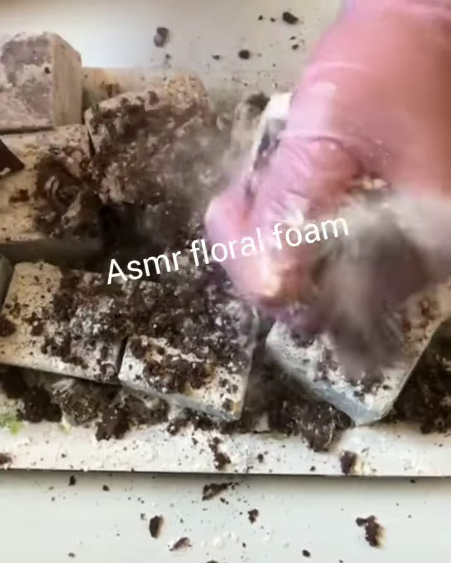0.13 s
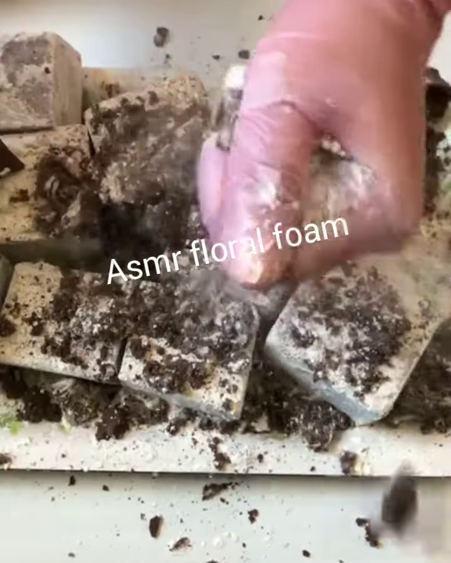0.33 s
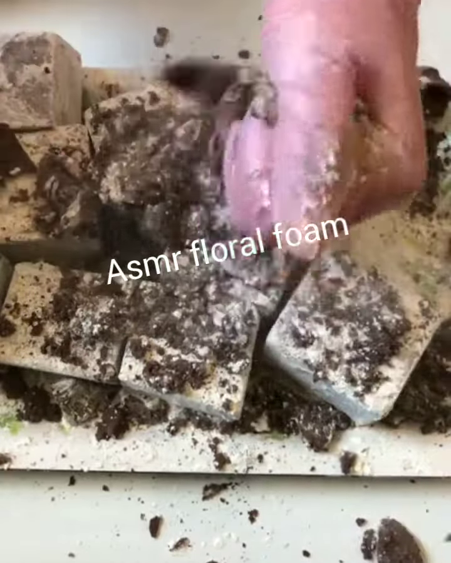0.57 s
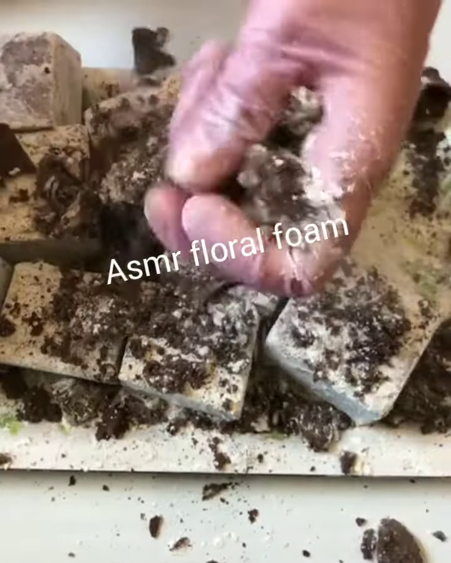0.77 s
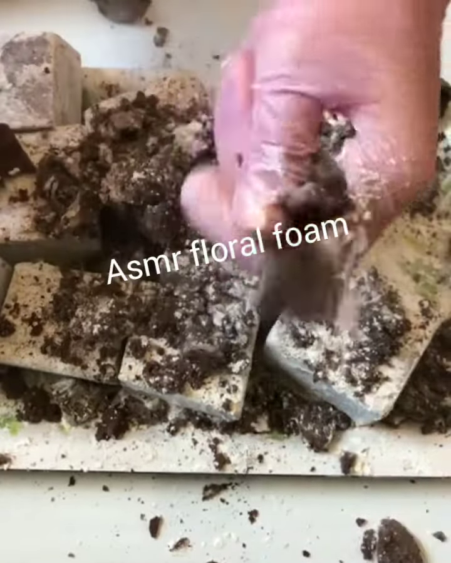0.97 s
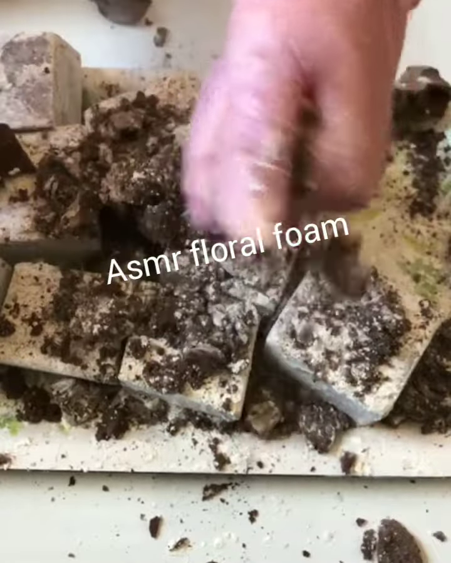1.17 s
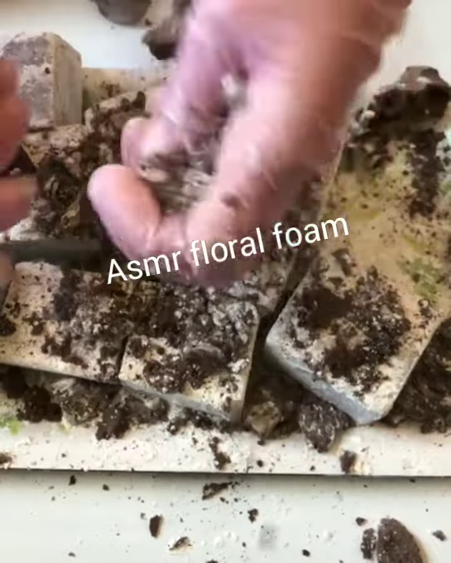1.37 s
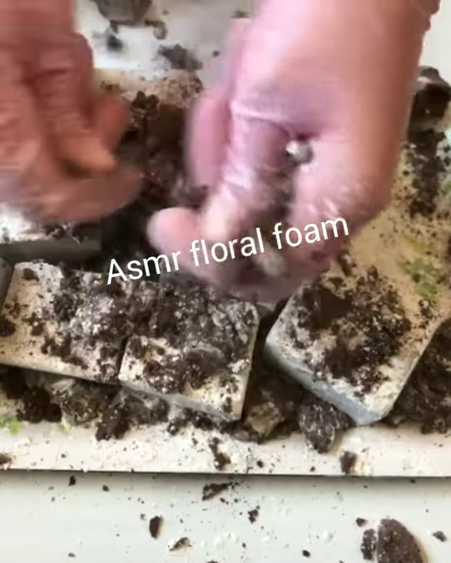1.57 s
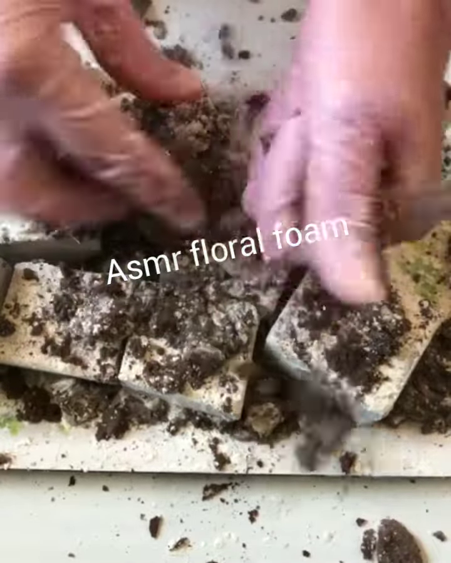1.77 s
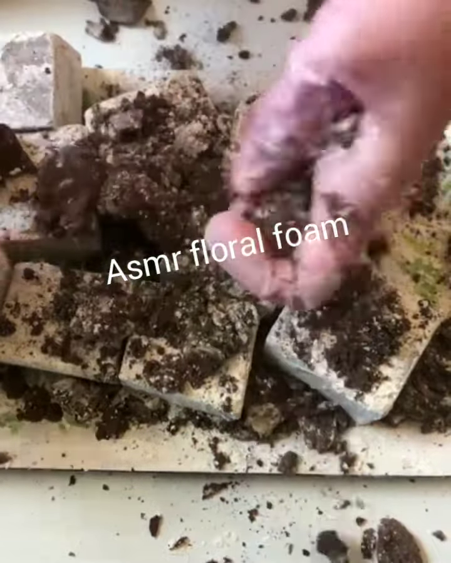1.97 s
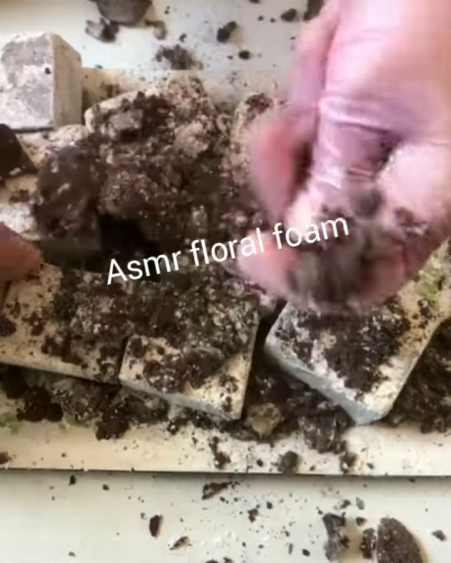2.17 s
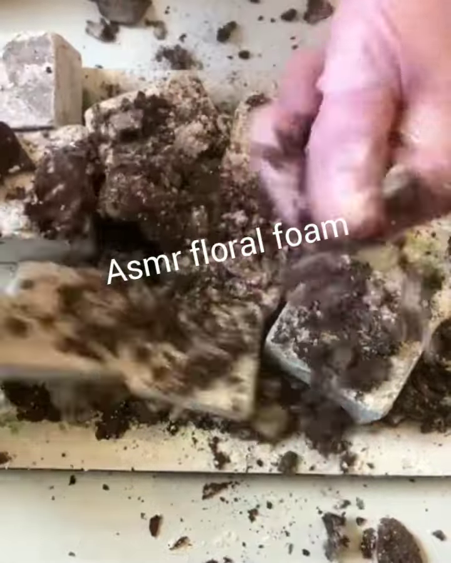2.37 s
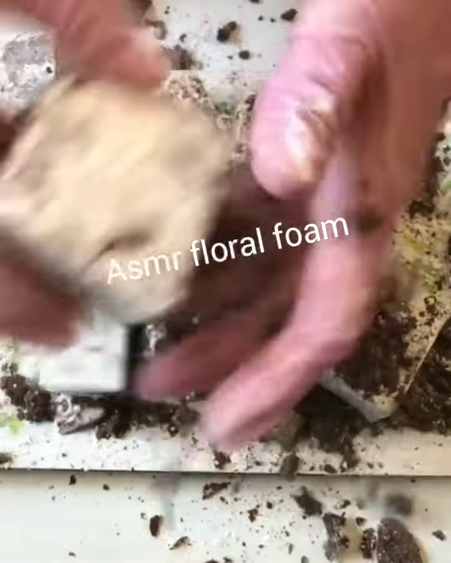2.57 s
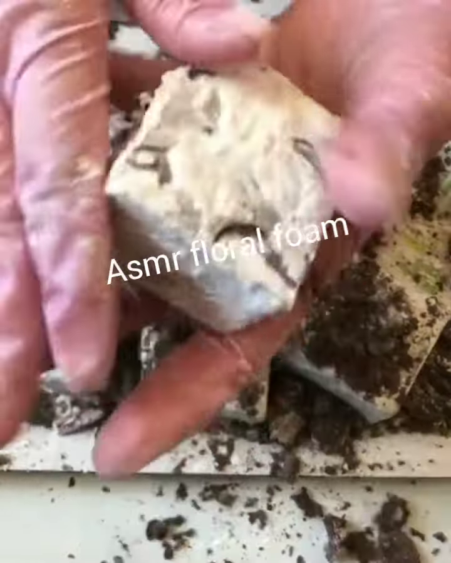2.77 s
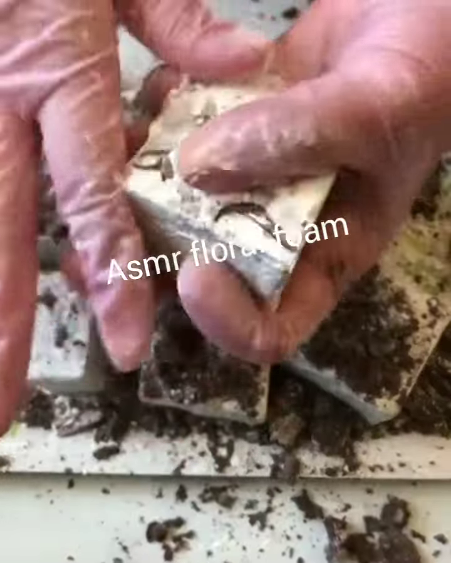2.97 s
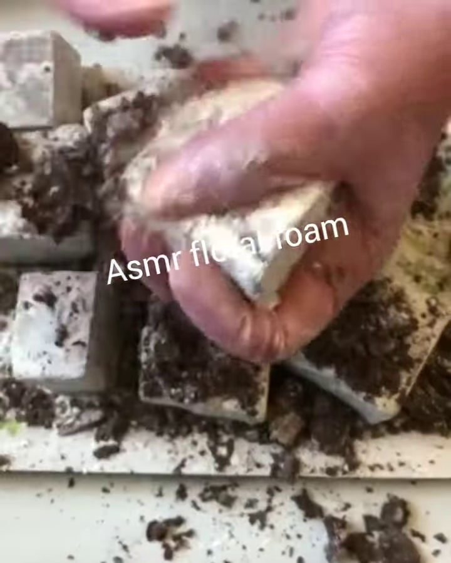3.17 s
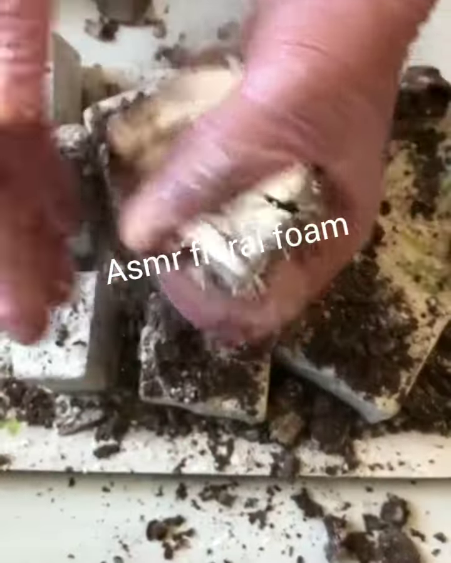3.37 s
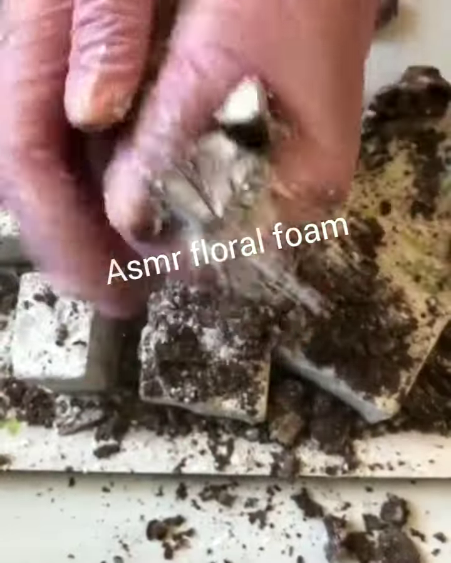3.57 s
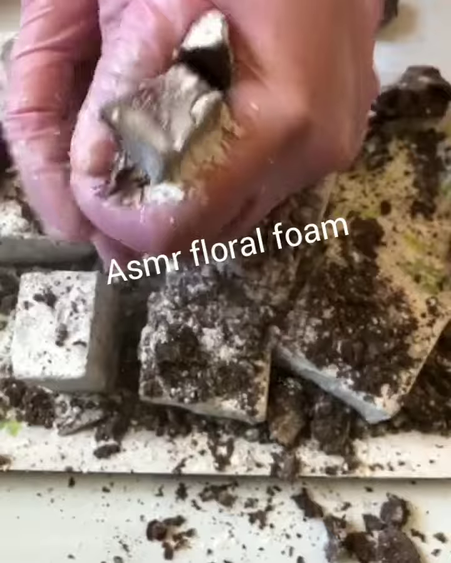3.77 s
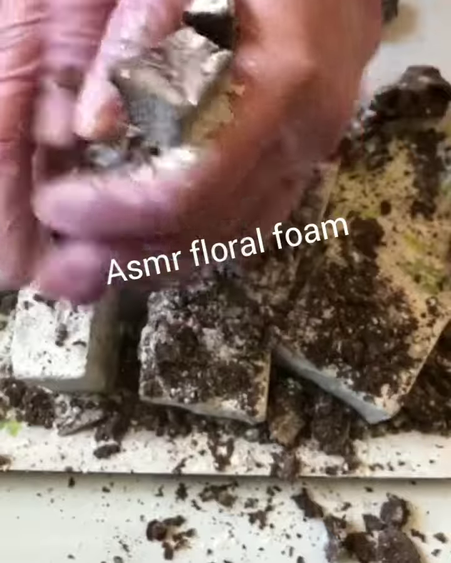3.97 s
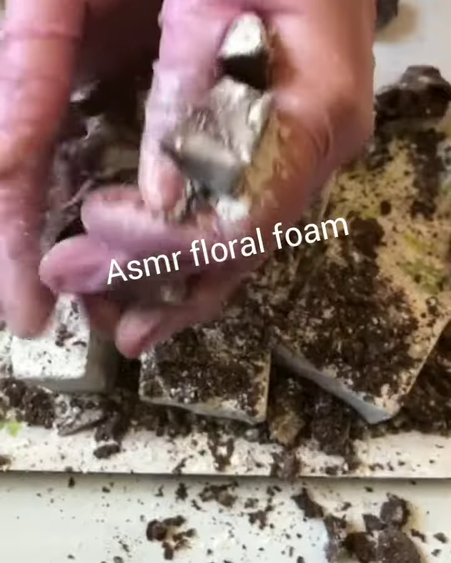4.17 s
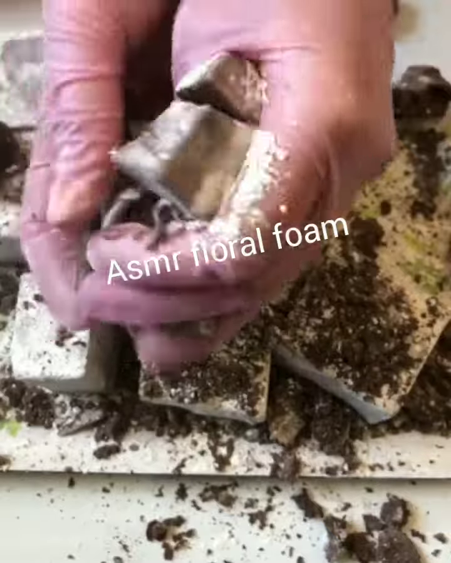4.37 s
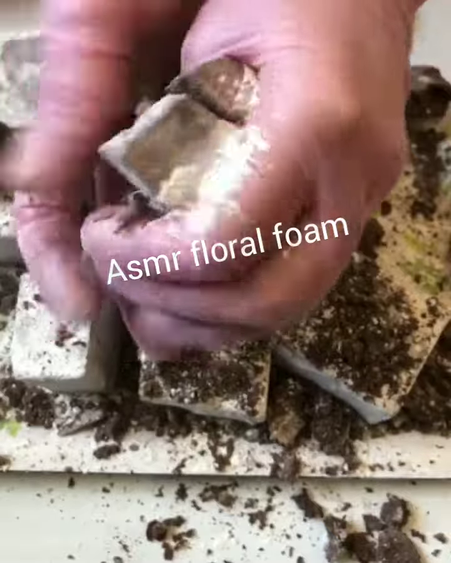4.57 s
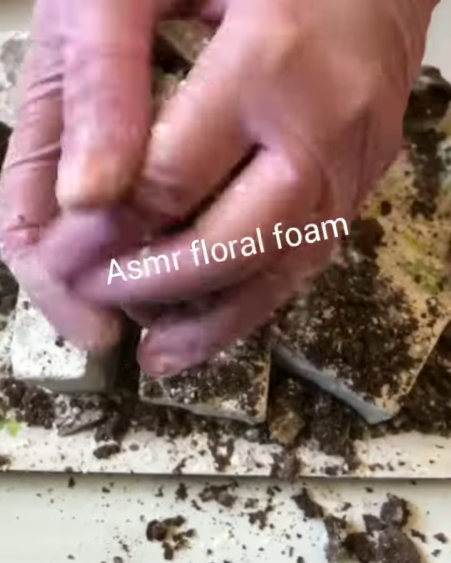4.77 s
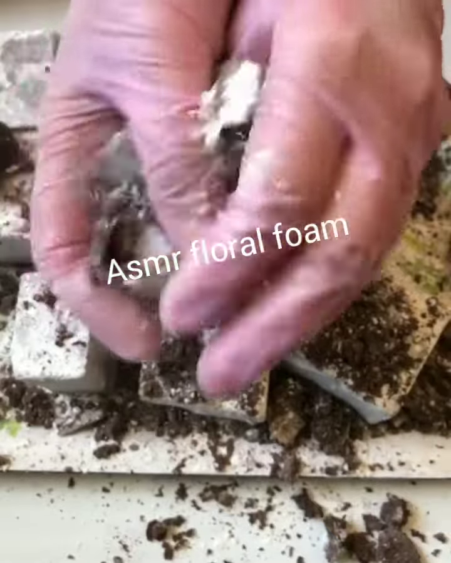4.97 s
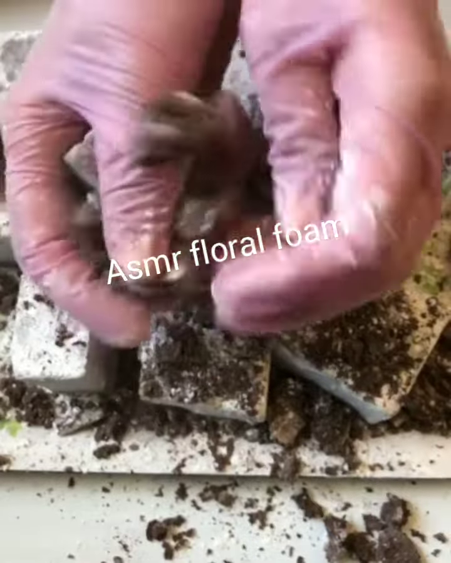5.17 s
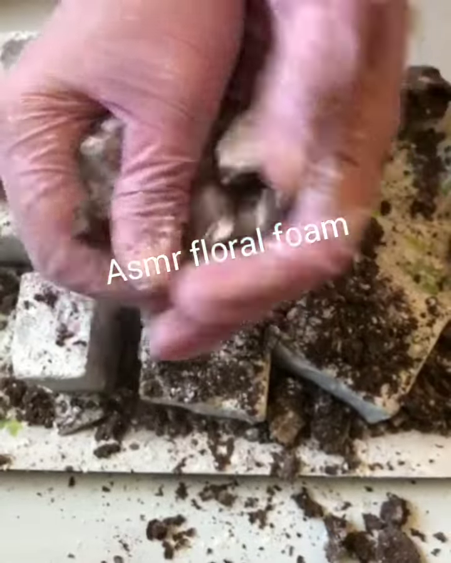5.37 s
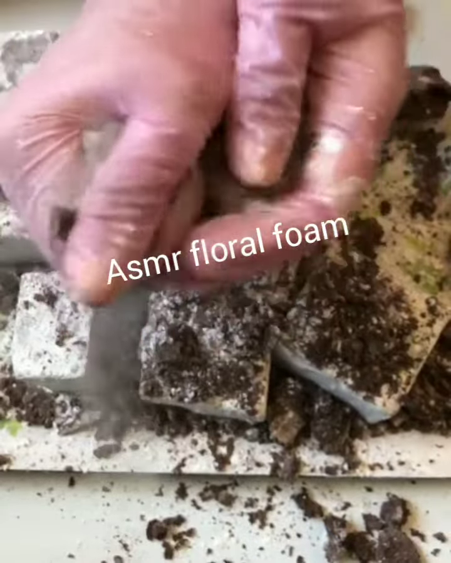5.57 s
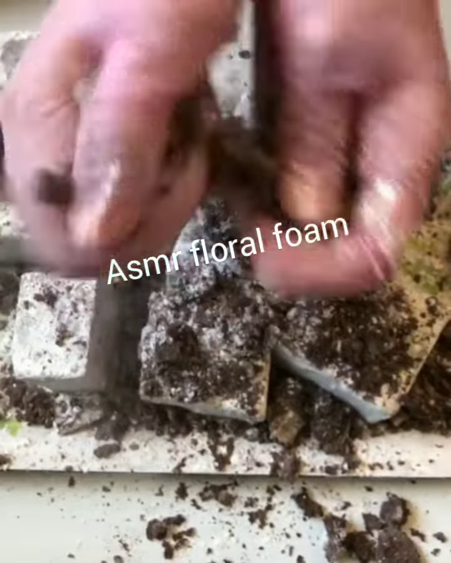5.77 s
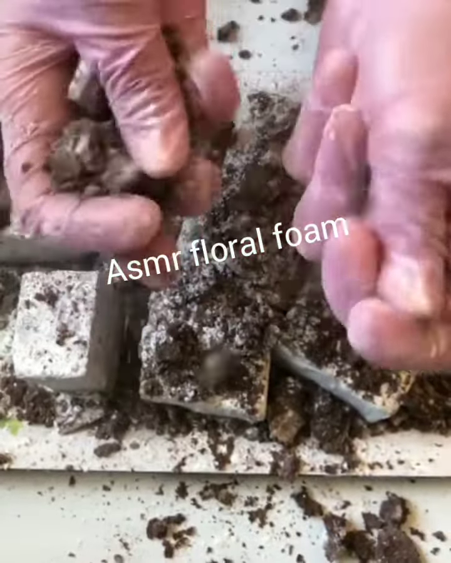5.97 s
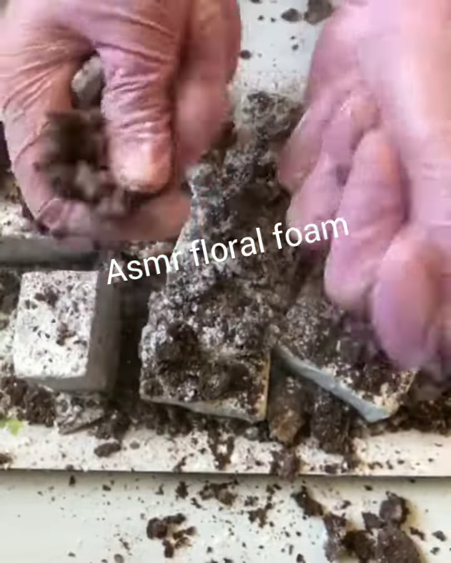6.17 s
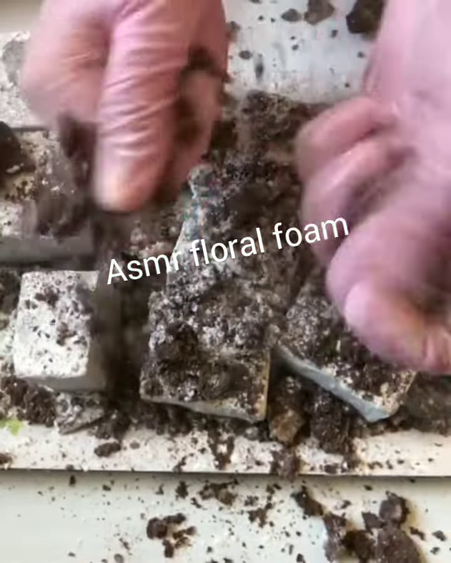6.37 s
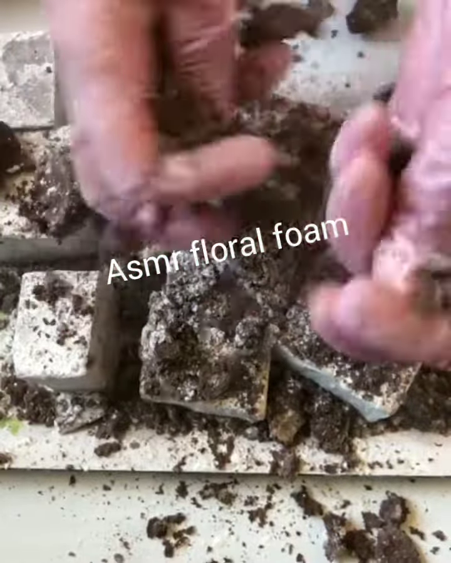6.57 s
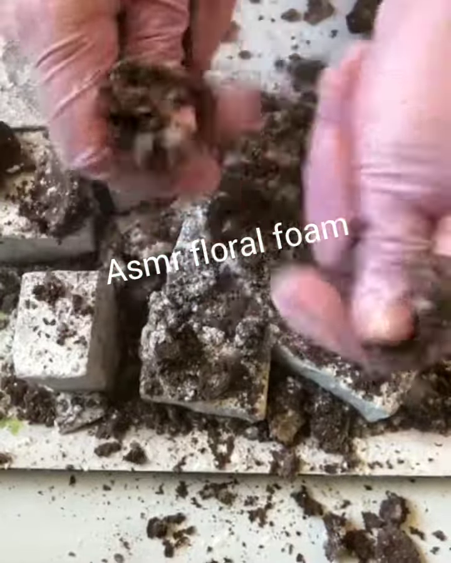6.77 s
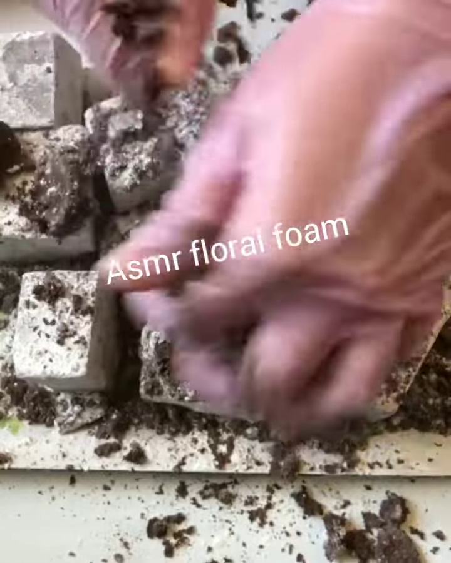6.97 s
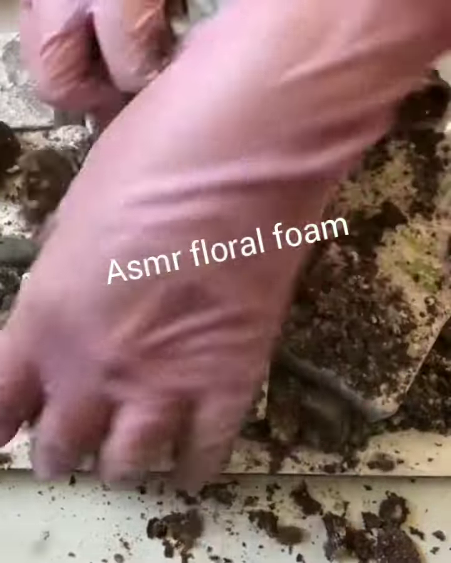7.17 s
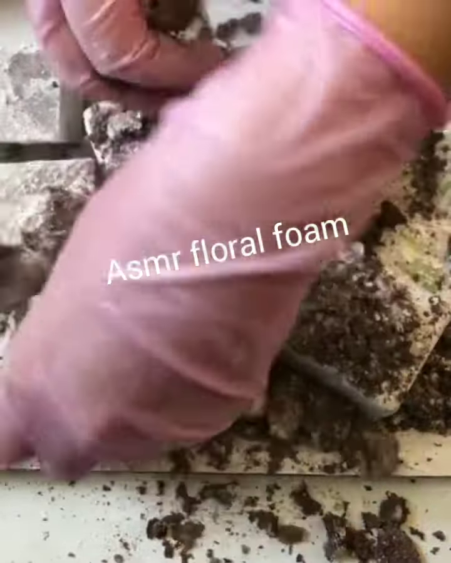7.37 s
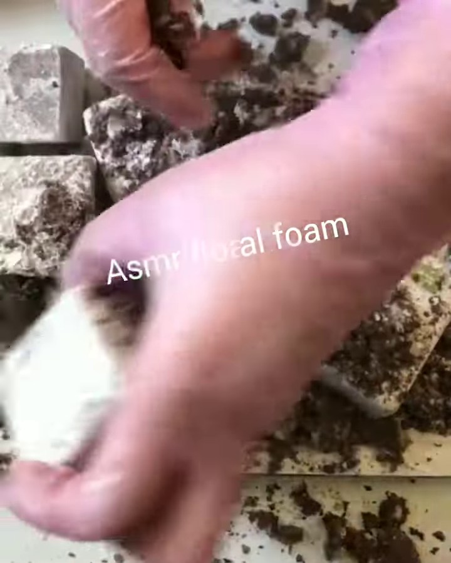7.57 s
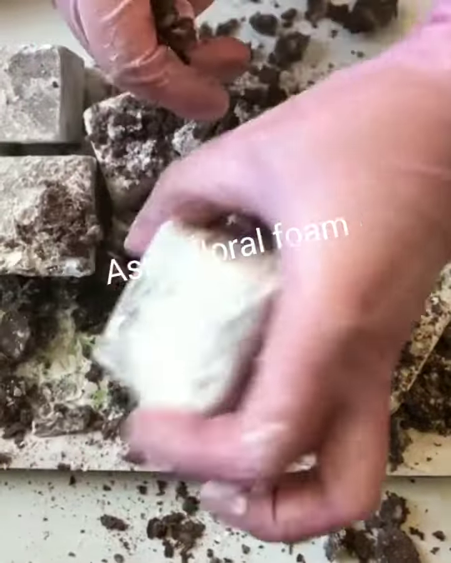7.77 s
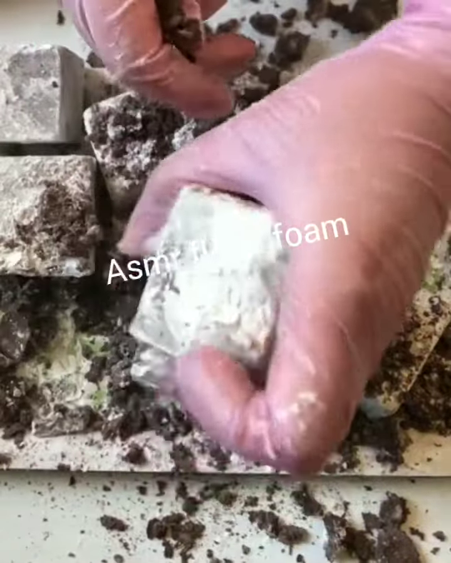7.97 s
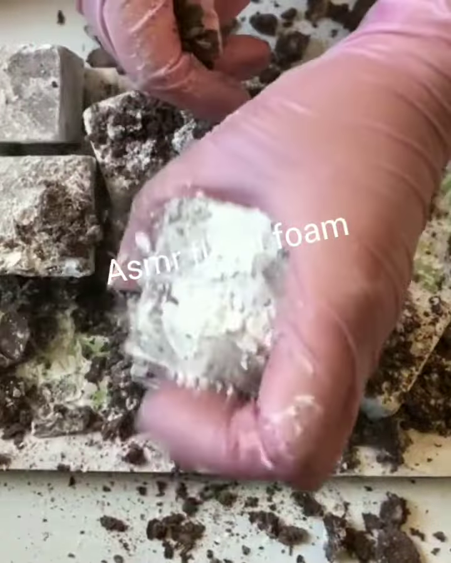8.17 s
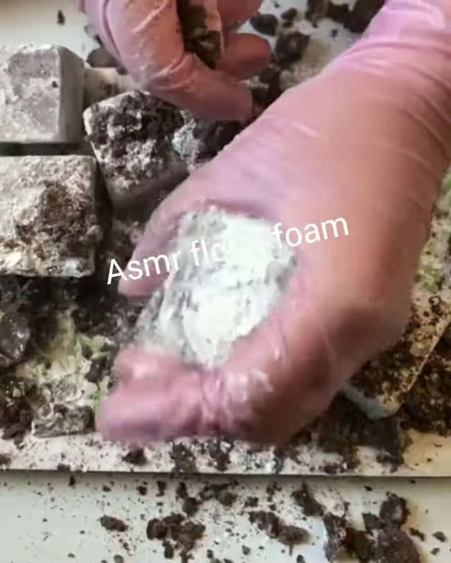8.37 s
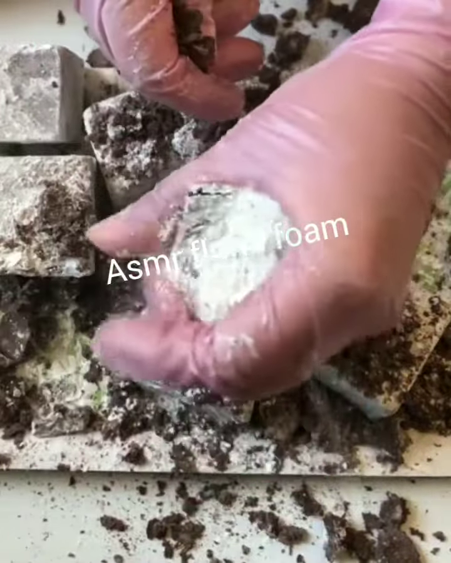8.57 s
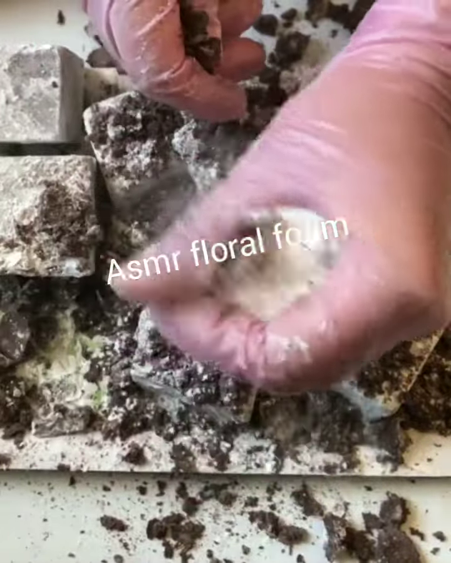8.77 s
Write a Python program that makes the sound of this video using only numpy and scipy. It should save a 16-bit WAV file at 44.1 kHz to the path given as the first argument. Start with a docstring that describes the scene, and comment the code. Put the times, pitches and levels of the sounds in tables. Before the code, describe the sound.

Gloved hands squeeze brittle dry foam close to the microphone, each squeeze a crisp, high fizz over a duller crunch, dotted with tiny ticks. It opens with a loud crunch, sharp cracks and a few dull clicks in the first half second. Softer crumbling follows in short pulses until about 2.8 seconds. A strong surge with dense snapping runs from 2.9 to 3.6 seconds, eases into moderate crunching, and swells again with more cracks from about 4.9 to 5.5 seconds. Lighter crumbling continues to around 7 seconds. In the lull, at about 7.2 seconds, crumbs drop on the heap with a dull patter and low thuds. From 8 seconds the crunching builds again, peaking near 8.7 seconds in a cluster of sharp cracks and soft thuds. The table and walls add a short echo, and the quiet room hums faintly throughout.

```python
"""At a table in a quiet, humming room, gloved hands squeeze brittle dry foam close to a microphone.
With each squeeze countless tiny cell walls break: a fizz on top, the duller crunch of the block below.
Single walls tick, larger cracks snap out, and crumbs drop on the heap. Low thuds and dull clicks
sound too, many together with a crack. The table and the walls add a short echo."""
import sys
import numpy as np
from scipy import signal
from scipy.fft import rfft, irfft, next_fast_len
from scipy.io import wavfile
from scipy.ndimage import uniform_filter1d

SR = 44100
rng = np.random.default_rng(int(sys.argv[2]) if len(sys.argv) > 2 else 0)


def log_audio(samples):
    """Write samples as a 16-bit WAV file to the path given in sys.argv[1]."""
    # one column per channel
    frames = np.atleast_2d(samples).T
    # limit to full scale, then quantise
    limited = np.clip(frames, -1, 1)
    pcm = np.round(limited * 32767).astype(np.int16)
    wavfile.write(sys.argv[1], SR, pcm)


N = 388962

# Squeezes of the hands: t/s, length/s, fizz at the start/dB, fizz at the end/dB, crunch over fizz/dB,
# rumble over fizz/dB, hollow of the cupped hands f/Hz, fizz f/Hz, fade on letting go/s
SQUEEZES = [(-.03, 0.31, -22.5, -34, -13.5, -18, 2950, 9400, .3),
            (0.216, 0.15, -24.5, -38.5, -12, -11.5, 1900, 8800, .3),
            (0.345, 0.13, -29.5, -36.5, -9, -11, 1410, 9900, 0.23),
            (0.506, .19, -44.5, -42.5, -1.5, -12.5, 2600, 7400, 0.73),
            (0.741, 0.2, -32, -38, -6.5, -18.5, 2350, 7400, 0.2),
            (0.942, .14, -33.5, -36.5, -13.5, -19.5, 1900, 9600, 0.37),
            (1.167, .14, -41, -38, -10, -24, 2440, 9000, 0.67),
            (1.363, .22, -33, -38, -7, -19, 2280, 9000, 0.26),
            (1.597, 0.13, -42, -41, -10, -15.5, 1720, 8300, 0.41),
            (1.772, 0.29, -47, -52, -7, -19, 2350, 8200, 0.34),
            (2.033, .12, -40.5, -44, -0.5, -22, 2400, 7400, 0.27),
            (2.164, .23, -43.5, -46, -3, -23, 2560, 8200, 0.17),
            (2.593, 0.14, -49.5, -41.5, 1, -15.5, 2480, 8000, 0.32),
            (2.781, 0.08, -41, -49.5, 2, -7, 2600, 9100, 0.33),
            (2.86, 0.24, -28.5, -26.5, -2.5, -15.5, 2760, 7900, 0.26),
            (3.067, 0.12, -18.5, -27.5, -5.5, -23, 2850, 9200, .3),
            (3.184, 0.17, -19.5, -25, -11.5, -21, 3080, 8300, 0.2),
            (3.358, 0.089, -31, -33.5, -5.5, -31, 2890, 9900, 0.33),
            (3.437, 0.12, -25.5, -29, -10, -31, 2400, 8700, 0.49),
            (3.56, 0.2, -33.5, -34, -4.5, -30, 1750, 6350, 0.27),
            (3.726, .15, -38.5, -34, -4, -23, 2600, 6500, 0.37),
            (3.91, 0.14, -37, -33, -8, -19.5, 2580, 8100, 0.52),
            (4.114, 0.063, -30.5, -30, -11, -32, 2050, 9800, .3),
            (4.215, 0.11, -36, -33, -7, -21, 1800, 7350, 0.42),
            (4.356, 0.092, -33.5, -38.5, -2.5, -13.5, 1950, 8250, 0.67),
            (4.47, 0.32, -50.5, -35.5, -3, -13.5, 2350, 8250, .3),
            (4.744, 0.2, -32.5, -39.5, -1, -18, 2800, 7450, 0.25),
            (4.888, 0.22, -36, -30.5, -1.5, -15.5, 1940, 8700, 0.27),
            (5.09, 0.36, -26.5, -30.5, -8, -19.5, 2500, 8160, .3),
            (5.298, 0.075, -19.5, -25.5, -13, -23, 2500, 8600, 0.34),
            (5.412, .21, -28.5, -39, -7.5, -13, 1750, 8900, 0.35),
            (5.66, 0.16, -41, -27.5, -9.5, -30, 2570, 8500, 0.62),
            (5.863, 0.18, -38, -33, -4.5, -19.5, 2000, 8950, 0.24),
            (6.062, 0.29, -32, -37.5, -8.5, -16, 2320, 9200, 0.56),
            (6.398, 0.38, -39.5, -37.5, -5, -20, 2690, 8560, 0.44),
            (6.796, 0.23, -42, -48.5, -7, -16.5, 2700, 9400, 0.35),
            (7.045, 0.1, -39, -50.5, -7, -17, 2210, 8100, 0.29),
            (7.175, 0.052, -41, -55, 4.5, 5.5, 1950, 6900, 0.23),
            (7.248, 0.18, -51, -46.5, 0.2, -15, 2970, 6030, 0.56),
            (7.544, 0.16, -47, -48.5, 2.2, -9.5, 2460, 8500, 0.18),
            (7.73, 0.1, -32, -44.5, -2, -11.5, 1800, 10600, .3),
            (7.812, .12, -41.5, -37.5, -0.5, -15.5, 2170, 8300, .3),
            (7.942, 0.21, -33.5, -39, -1.5, -14, 2470, 8800, .3),
            (8.087, .12, -35.5, -28.5, -3, -23, 2400, 9500, .1),
            (8.271, .11, -34.5, -32, -3.5, -23, 3070, 9700, .15),
            (8.407, 0.25, -23.5, -31, -6, -22, 2400, 9200, .3),
            (8.626, 0.122, -32.5, -18.5, -9, -18, 2800, 9150, 0.069),
            (8.777, 0.038, -28, -29, -14, -32, 3300, 8900, .3)]
# Tone shapes (how strong each pitch is) of thin walls, block, lumps and room air: f/Hz, level/dB
FIZZ_SHAPE = [(3500, -9.5), (4600, 3.5), (5400, 4), (7000, 2), (9000, 1), (10300, 1.5), (12000, 3.5),
              (15000, 4.5)]
CRUNCH_SHAPE = [(500, -22), (900, -2), (1300, 0), (2000, -4), (2800, -4.5), (3500, -2.5), (4300, 2.5),
                (5500, -29.5)]
RUMBLE_SHAPE = [(30, -39), (70, -8), (150, -2), (250, -1.5), (400, -4.5), (700, 3), (950, -5), (1600, -22)]
AIR_SHAPE = [(12, -83), (20, -57), (48, -3), (69, -5), (125, 3), (206, -7), (468, -12), (1840, -37),
             (2110, -6), (6500, -23.5), (14000, -47)]
# Large cracks, and one longer dull burst (at 7.187 s) as crumbs drop on the heap:
# t/s, bright level/dB, dull level/dB, dull f/Hz, tearing time/s
CRACKS_AND_DROP = [(.007, -10, -39, 2300, 0.001), (0.0237, -16, -27, 2320, 0.0018),
                   (0.047, -27, -31, 2200, 0.0041), (0.073, -29, -33, 2210, 0.0011),
                   (0.0919, -12.5, -29, 2400, .006), (0.0973, -10.5, -22, 2400, 0.0013),
                   (0.1087, -12, -34, 2370, 0.0014), (0.1326, -9, -45, 2180, 0.001),
                   (0.151, -19, -49, 1850, 0.0045), (0.1644, -20, -33.5, 945, 0.0039),
                   (.21, -16, -30, 1080, 0.0013), (0.236, -21.5, -29.5, 1440, 0.005),
                   (.262, -22, -41, 1700, 0.0027), (0.276, -18.5, -32, 2130, 0.0032),
                   (0.3084, -17.5, -45, 1630, 0.0022), (0.3252, -14, -31, 1370, .0013),
                   (0.3654, -31, -32, 890, 0.0055), (0.3916, -26, -36.5, 2030, 0.0037),
                   (.421, -28, -31.5, 870, 0.0026), (.437, -27, -43, 2050, .0025),
                   (.4634, -31, -40, 2030, 0.0029), (.4749, -46, -34, 760, 0.0025),
                   (.734, -40, -44, 3010, .002), (.855, -43, -48, 700, 0.0027),
                   (0.909, -35, -37, 900, .002), (0.9767, -41, -30, 980, 0.001),
                   (1.0393, -25.5, -57, 2200, 0.0038), (1.316, -28, -30, 3100, 0.00086),
                   (1.409, -27, -41, 2810, 0.0015), (1.8875, -41, -46, 3250, 0.0064),
                   (1.9318, -40, -63, 1950, 0.0056), (2.5132, -46, -39.5, 2700, 0.0042),
                   (2.5826, -39.5, -40, 1720, 0.0014), (2.857, -27.5, -32, 2360, 0.0016),
                   (2.884, -28, -35, 1880, 0.0024), (2.9838, -20, -25, 2490, 0.0014),
                   (2.9935, -17, -28, 3150, 0.00098), (3.004, -13, -28, 2930, 0.0019),
                   (3.0264, -28, -27, 2370, .001), (3.1085, -16.5, -26, 3200, 0.0024),
                   (3.193, -23, -22.5, 2420, 0.0041), (3.214, -15, -22, 2600, 0.0061),
                   (3.2353, -10, -18.5, 1840, .0036), (3.2475, -20, -10, 3800, 0.00096),
                   (3.2677, -12, -22, 2330, 0.0072), (3.285, -19, -28, 2450, 0.0032),
                   (3.2984, -21, -15, 2180, 0.002), (3.321, -11, -20, 2160, 0.002),
                   (3.335, -12, -14, 2260, 0.0044), (3.384, -27, -30, 2380, .0022),
                   (3.3904, -22, -38, 3040, .002), (3.411, -33, -27, 3120, .0013),
                   (3.4485, -13, -24.5, 2780, 0.0042), (3.4615, -16.5, -24, 1720, 0.0077),
                   (3.5, -11.5, -21.5, 2210, 0.0022), (3.6492, -26, -37, 2830, .001),
                   (3.756, -23, -33, 2440, 0.00092), (3.7802, -27, -49, 1810, .0017),
                   (3.816, -24, -45, 2620, 0.00086), (4.056, -25.5, -39, 1630, .0022),
                   (4.154, -24, -50, 2960, .001), (4.2154, -31, -35, 1580, 0.0014),
                   (4.272, -41, -29.5, 1530, 0.0013), (4.8074, -26.5, -25, 2770, 0.0018),
                   (4.861, -31, -34, 2370, .0025), (4.9003, -12, -17, 1630, 0.0025),
                   (4.9347, -40, -29, 2200, 0.0017), (5.0156, -11, -24, 2500, 0.0015),
                   (5.019, -21, -27, 2770, 0.0072), (5.0337, -26, -15.5, 2130, 0.0018),
                   (5.072, -34, -25, 1960, 0.0019), (5.0829, -31, -21.5, 2130, 0.001),
                   (5.1232, -22, -18, 2240, 0.001), (5.1311, -12, -20, 2030, 0.00069),
                   (5.139, -18, -16, 2020, 0.0015), (5.174, -32, -29.5, 1310, 0.0044),
                   (5.2998, -13.5, -25, 2370, 0.0032), (5.3137, -14, -36, 2570, 0.0022),
                   (5.341, -12, -37, 2950, 0.0011), (5.353, -17, -42, 2410, .002),
                   (5.3723, -16, -31, 2540, .001), (5.3927, -35, -22.5, 2000, 0.0024),
                   (5.445, -42, -26, 1460, 0.0029), (5.486, -25, -35, 2010, 0.002),
                   (5.7647, -31, -42, 2580, 0.0028), (5.8986, -24, -33, 2600, 0.00085),
                   (6.0093, -40, -24, 1140, 0.0018), (6.149, -27, -33, 1200, 0.0016),
                   (6.3048, -24.5, -48, 1410, 0.0018), (7.187, -52, -35, 2050, 0.015),
                   (7.2502, -58, -43, 2200, .0045), (7.297, -54, -53, 3000, .002),
                   (7.478, -35.5, -52, 2720, .0026), (7.6217, -59, -31.5, 3600, 0.0034),
                   (7.7579, -43, -43, 1800, 0.015), (8.0987, -23, -36, 1710, 0.0045),
                   (8.135, -25, -29.5, 2270, .0039), (8.1558, -24.5, -22.5, 2160, 0.0031),
                   (8.1707, -16.5, -34, 2480, 0.00082), (8.1926, -21, -25, 2480, 0.0011),
                   (8.241, -53, -30, 1840, 0.0011), (8.285, -29.5, -36, 1830, 0.0026),
                   (8.3423, -21, -19.5, 2100, 0.0016), (8.4507, -20, -20.5, 2210, 0.0039),
                   (8.5043, -17.5, -39, 3250, 0.0015), (8.5526, -15, -34, 2230, 0.0018),
                   (8.587, -24, -29, 2360, 0.0056), (8.6323, -13.5, -19.5, 2520, 0.0038),
                   (8.661, -18.5, -21.5, 2140, .006), (8.6818, -14, -25, 1810, .004),
                   (8.6972, -10.5, -18, 1900, 0.0017), (8.7021, -8, -25, 2210, 0.00082),
                   (8.7211, -8, -18, 2320, 0.0012), (8.731, -21, -30, 2200, .001),
                   (8.748, -19, -26, 2000, 0.0024), (8.752, -8.5, -23, 2150, 0.00089),
                   (8.793, -15.5, -37, 2130, .001), (8.8, -24, -48, 2300, 0.00084),
                   (8.8135, -19, -27.5, 3300, 0.0021)]
# Low thuds and dull clicks, many sounding together with a crack: t/s, level/dB, f/Hz
THUDS_AND_CLICKS = [(.235, -32, 260), (.259, -35, 557), (.365, -31, 484), (0.392, -36, 400),
                    (.421, -33, 450), (.476, -35, 520), (1.467, -35.5, 243), (2.513, -36, 188),
                    (2.577, -40, 320), (3.236, -28, 425), (3.324, -31, 550), (5.299, -36, 450),
                    (5.338, -30, 167), (6.299, -35, 530), (7.197, -36, 450), (7.215, -22, 239),
                    (7.222, -34, 74.6), (7.242, -37, 238), (7.354, -31, 216), (7.764, -35, 665),
                    (8.636, -31, 220), (8.663, -24.5, 240), (8.699, -28, 250), (8.75, -29, 220)]
# How the microphone lifts or lowers each pitch: f/Hz, level/dB
MICROPHONE_SHAPE = [(15, -13), (60, -0.5), (3600, 0), (4400, -2.5), (5200, 2), (9300, 1), (10200, -0.5),
                    (15000, 0)]


def gain_of(db):
    """Turns decibels into a multiplier. A fade time called t60 is the seconds taken to fall 60 dB."""
    return 10 ** (np.asarray(db) / 20)


def evened(x):
    """Scales a signal to an average strength (rms) of 1."""
    return x / np.sqrt(np.mean(x ** 2) + 1e-20)


def level_at(shape, hz):
    """Looks up a tone shape's level in dB at any pitch."""
    shape_hz, shape_db = np.transpose(shape)
    return np.interp(np.log(hz + 1), np.log(shape_hz + 1), shape_db)


def add(mix, start_s, sound):
    """Mixes a sound in at the given time."""
    part = mix[round(start_s * SR):][:len(sound)]
    part += sound[:len(part)]


def colour(x, shape):
    """Gives a sound a tone shape, with a filter that rings only after each hit."""
    hz = abs(np.fft.fftfreq(8192, 1 / SR))
    log_gain = np.log(gain_of(np.maximum(level_at(shape, hz), -100)))
    response = np.exp(np.conj(signal.hilbert(log_gain)))
    return signal.oaconvolve(x, np.fft.ifft(response).real[:4096])[:N]


def resonate(x, hz, width_hz):
    """Rings at a pitch that may move: shifts that pitch down to zero, smooths, and shifts back."""
    turn = np.exp(2j * np.pi * np.cumsum(hz * np.ones(len(x))) / SR)
    decay = np.exp(-np.pi * width_hz / SR)
    return 2 * (turn * signal.lfilter([1 - decay], [1, -decay], x / turn)).real


def wander(hz):
    """A random wobble with nothing slower than 3 Hz; the further above hz, the weaker it moves."""
    size = N // 32 + 2
    rates = np.fft.rfftfreq(size, 32 / SR)
    spectrum = rfft(rng.standard_normal(size)) / np.sqrt(1 + (rates / hz) ** 2)
    wobble = irfft(spectrum * (rates > 3), size)
    return np.interp(np.arange(N) / 32, np.arange(size), evened(wobble))


def squeezing(attack_s=0.039, trickle_db=-63.5):
    """Hands bite, drift in force, let go. Gives fizz, crunch, rumble in dB, then hollow, fizz in Hz."""
    # crumbs keep trickling between squeezes
    sums = np.outer([1.6, 0.91, 0.51, 3000, 5300], np.full(N, gain_of(2 * trickle_db)))
    for start, length, start_db, end_db, crunch_db, rumble_db, hollow_hz, fizz_hz, t60 in SQUEEZES:
        t = np.arange(max(-start, 0), length + t60, 1 / SR)
        level_db = np.interp(t, [0, length, length + t60], [start_db, end_db, end_db - 60])
        power = (np.minimum(t / attack_s, 1) * gain_of(level_db)) ** 2
        weights = [1, gain_of(2 * crunch_db), gain_of(2 * rumble_db), hollow_hz, fizz_hz]
        for total, weight in zip(sums, weights):
            add(total, max(start, 0), weight * power)
    levels_db = 10 * np.log10(sums[:3])
    pitches_hz = sums[3:] / sums[0]  # the loudest squeeze counts most
    return *levels_db, *pitches_hz


def breaks(per_s, spread_db, t60):
    """Cell walls break at random, each a puff of noise that starts at once and dies quickly."""
    sizes = gain_of(spread_db * np.minimum(rng.exponential(1, N), 6))
    hits = sizes * (rng.random(N) < per_s / SR)
    power = signal.lfilter([1], [1, -gain_of(-120 / (t60 * SR))], hits ** 2)
    return evened(np.sqrt(power) * rng.standard_normal(N))


def patchy(x, depth_db):
    """Each moment breaks cells of other sizes: random loud and soft patches over time and pitch."""
    spectra = signal.stft(x, nperseg=256, noverlap=192)[2]
    across_pitch = uniform_filter1d(rng.standard_normal(spectra.shape), size=3, axis=0)
    patches = evened(uniform_filter1d(across_pitch, size=14, axis=1))
    return signal.istft(spectra * gain_of(depth_db * patches), nperseg=256, noverlap=192)[1][:N]


def crumbling(fizz_db, crunch_db, rumble_db, hollow_hz, fizz_hz):
    """Clumps of breaks shake thin walls, block and lumps; each part has breaks of its own too."""
    clumps = wander(hz=35.4)
    common = breaks(per_s=3100, spread_db=0.5, t60=0.0033)
    parts = []
    for shape, share, clump_db in [(FIZZ_SHAPE, .7, 1.5), (CRUNCH_SHAPE, .6, 1.5),
                                   (RUMBLE_SHAPE, .4, 1.2)]:
        own = breaks(per_s=3000, spread_db=0.5, t60=0.0075)
        drive = share * common + np.sqrt(1 - share ** 2) * own
        flicker = gain_of(clump_db * clumps + 0.67 * wander(hz=1.7))
        parts.append(evened(colour(drive * flicker, shape)))
    fizz, crunch, rumble = parts
    crunch = evened(crunch + 4.5 * resonate(crunch, hollow_hz, width_hz=1550))  # the cupped hands ring
    fizz = evened(fizz + 5.3 * resonate(fizz, fizz_hz, width_hz=4140))
    foam = gain_of(fizz_db) * fizz + gain_of(crunch_db) * crunch + gain_of(rumble_db) * rumble
    return patchy(foam, depth_db=2.0)


def ticks(fizz_db):
    """Single small cell walls tick out of the fizz, following the squeeze."""
    puffs = breaks(per_s=200, spread_db=-2.0, t60=0.0028)
    return gain_of(fizz_db - 15.5) * evened(colour(puffs, FIZZ_SHAPE))


def room_tone(air_db=-59.5, hum_db=-64, hum_hz=150.1, width_hz=3.4):
    """Steady air noise with a fuzzy low hum, made from a narrow band of noise."""
    air = evened(colour(rng.standard_normal(N), AIR_SHAPE))
    band = signal.butter(N=1, Wn=[hum_hz - width_hz / 2, hum_hz + width_hz / 2], btype="band", fs=SR)
    hum = evened(signal.lfilter(*band, rng.standard_normal(N)))
    return gain_of(air_db) * air + gain_of(hum_db) * hum


def burst(noise, hz, width_hz, tear_s, t60):
    """A sharp first break, spiky noise while the crack runs, then a quick fade, all ringing broadly."""
    t = np.arange(len(noise)) / SR
    spiky = noise * np.sqrt(abs(noise))
    first_break = 1 + 2.0 * np.exp(-t / 0.00048)
    run_s = max(tear_s - .001, 0)
    after = np.maximum(t - run_s, 0)
    fade = gain_of(-60 * after / t60)
    splinters = gain_of(-10.5 - 60 * after / 0.027)  # these keep falling a while
    drive = spiky * first_break * (fade + splinters)
    ring = resonate(resonate(drive, hz, width_hz), hz, width_hz)
    return ring / np.sqrt(np.sum(ring ** 2) / (SR * (tear_s + 0.000047)))


def cracks_and_drop(fizz_hz):
    """A crack is a bright tear plus a duller ring of the block; the crumb drop is made the same way."""
    out = np.zeros(N)
    for start, bright_db, dull_db, dull_hz, tear_s in CRACKS_AND_DROP:
        noise = rng.standard_normal((2, 1500))
        bright = burst(noise[0], fizz_hz[round(start * SR)], width_hz=6500, tear_s=tear_s, t60=.005)
        dull = burst(noise[1], dull_hz, width_hz=1.07 * dull_hz, tear_s=tear_s, t60=0.0034)
        add(out, start, gain_of(bright_db) * bright + gain_of(dull_db) * dull)
    return signal.sosfilt(signal.butter(N=2, Wn=330, btype="high", fs=SR, output="sos"), out)


def thuds_and_clicks(ring_s=0.01, extra_cycles=1.6):
    """A few soft cycles of a fading tone: the low ones thud, the higher ones make a dull click."""
    out, t = np.zeros(N), np.arange(6000) / SR
    rise = 1 - np.exp(-t / 0.00086)
    for start, db, hz in THUDS_AND_CLICKS:
        t60 = ring_s + extra_cycles / hz
        tone = rise * gain_of(-60 * t / t60) * np.sin(2 * np.pi * hz * t)
        add(out, start, gain_of(db) * tone / abs(tone).max())
    return signal.sosfilt(signal.butter(N=2, Wn=60, btype="high", fs=SR, output="sos"), out)


def reflections(x, t60=0.34):
    """Sound bounces off table and walls: a short noisy tail whose dull part dies first."""
    t = np.arange(SR // 4) / SR
    noise = rng.standard_normal(len(t)) * (t > .002)
    dull = uniform_filter1d(noise, size=8)
    bright = noise - dull
    tail = evened(dull) * gain_of(-60 * t / (0.55 * t60)) + bright * gain_of(-60 * t / t60)
    return signal.oaconvolve(x, tail / np.linalg.norm(tail))[:N]


def scene():
    """Mixes the foam, its echo and the room, the same on the left and the right."""
    fizz_db, crunch_db, rumble_db, hollow_hz, fizz_hz = squeezing()
    snaps = cracks_and_drop(fizz_hz) + ticks(fizz_db)
    foam = crumbling(fizz_db, crunch_db, rumble_db, hollow_hz, fizz_hz)
    knocks = thuds_and_clicks()
    echo = reflections(gain_of(-13.5) * (snaps + knocks) + gain_of(-17) * foam)
    mono = foam + snaps + knocks + echo + room_tone()
    return np.array([mono, mono])


def record(dry, bass_lag=1.12, ceiling=.93, top_hz=13960):
    """The microphone shapes the tone, delays the bass, rounds off loud peaks and cuts the top treble."""
    size = next_fast_len(N + 8192)
    hz = np.fft.rfftfreq(size, 1 / SR)
    lag_cycles = bass_lag * np.log(1 + hz / 60)
    response = gain_of(level_at(MICROPHONE_SHAPE, hz)) * np.exp(-2j * np.pi * lag_cycles)
    shaped = irfft(rfft(dry, size) * response, size)[:, :N]
    rounded = shaped / (1 + abs(shaped / ceiling) ** 6) ** (1 / 6)
    treble_cut = signal.firwin(801, top_hz, window=("kaiser", 6), fs=SR)
    return signal.oaconvolve(rounded, treble_cut[None], "same")


dry = scene()
out = record(dry)
log_audio(out)
```